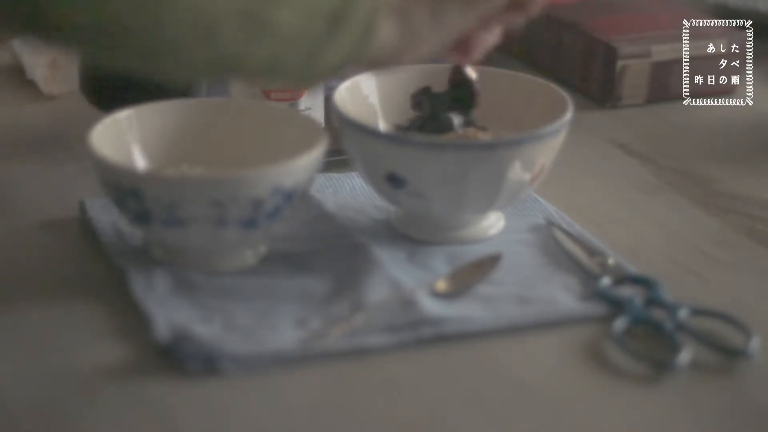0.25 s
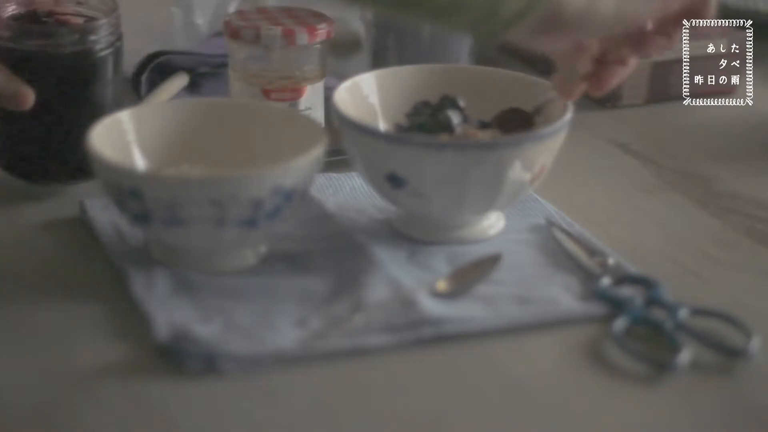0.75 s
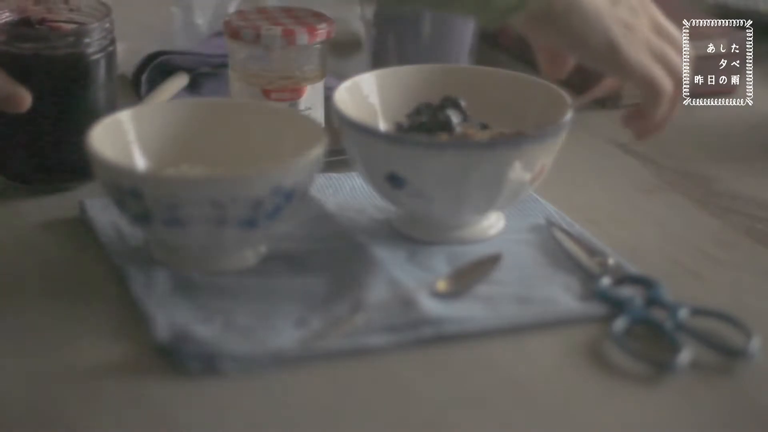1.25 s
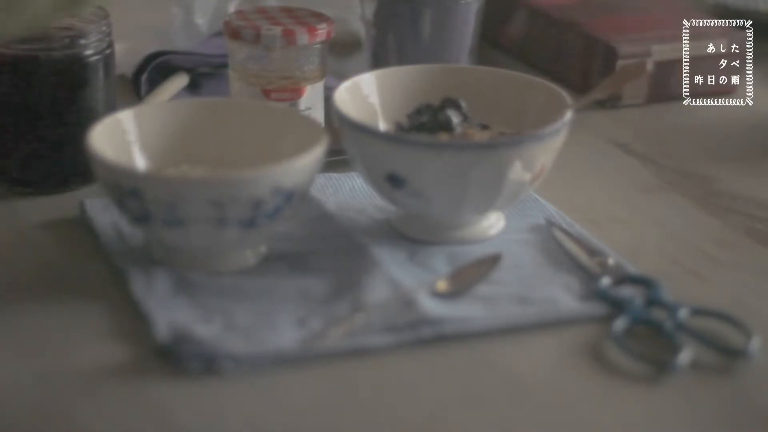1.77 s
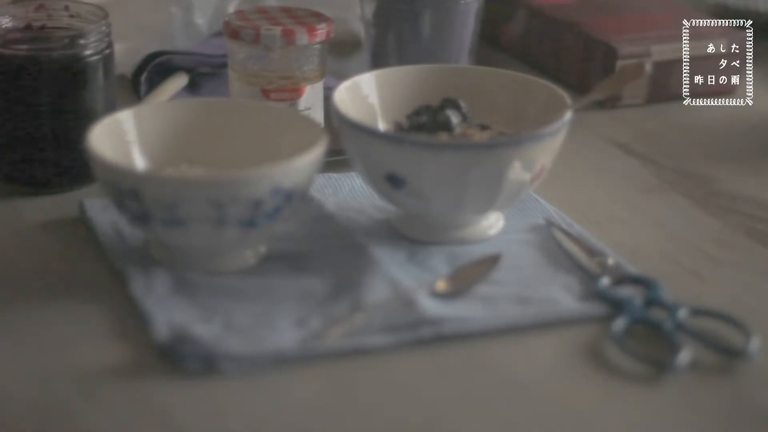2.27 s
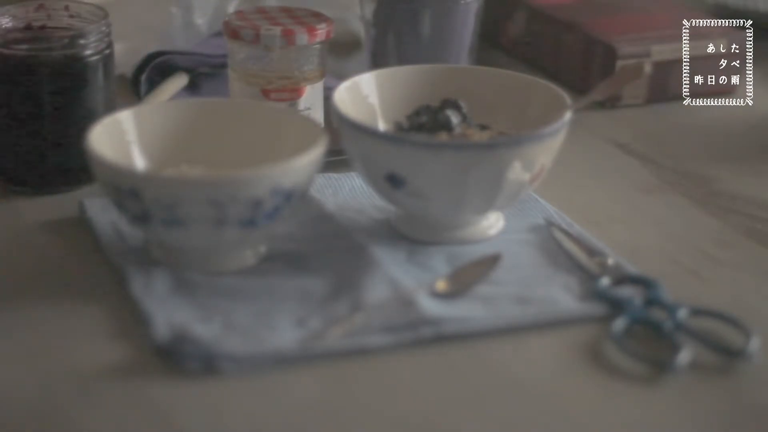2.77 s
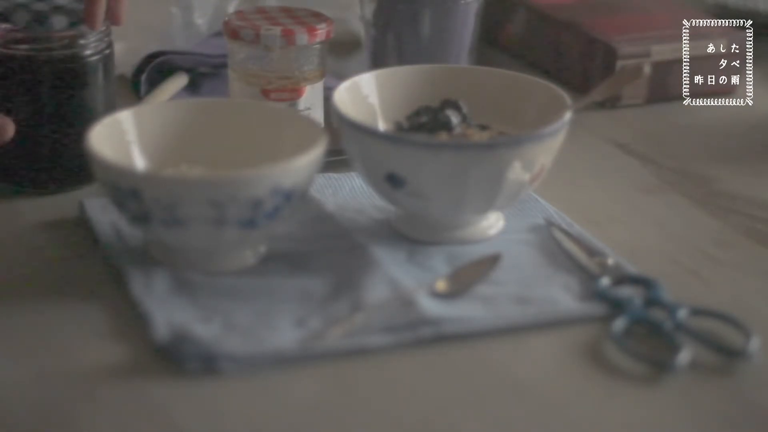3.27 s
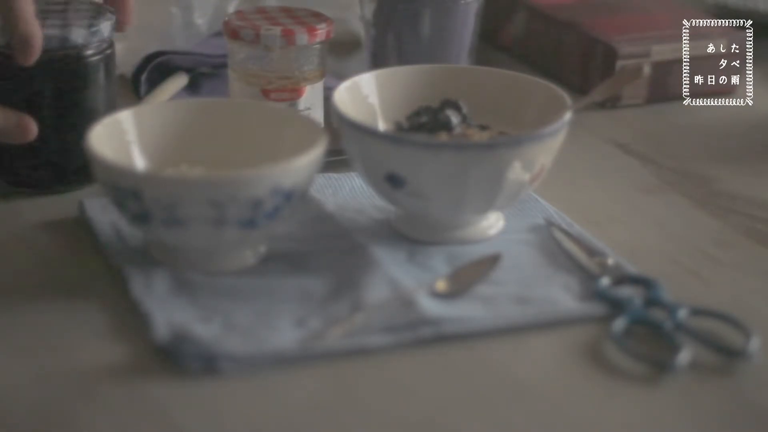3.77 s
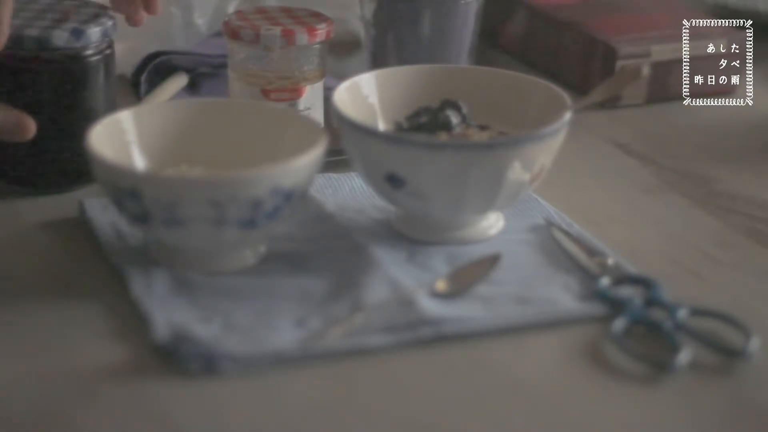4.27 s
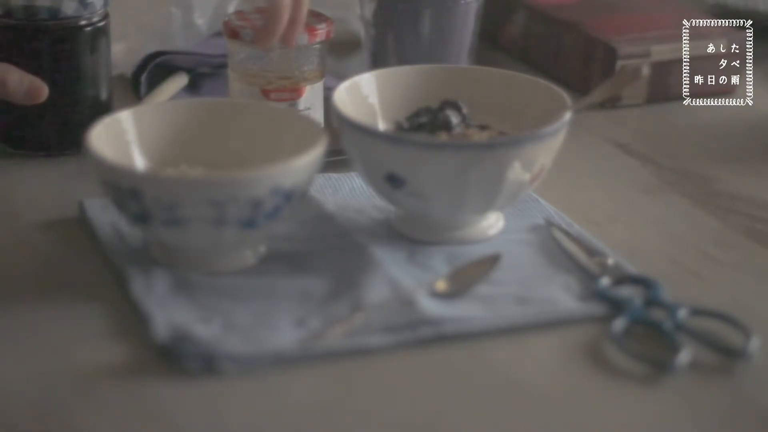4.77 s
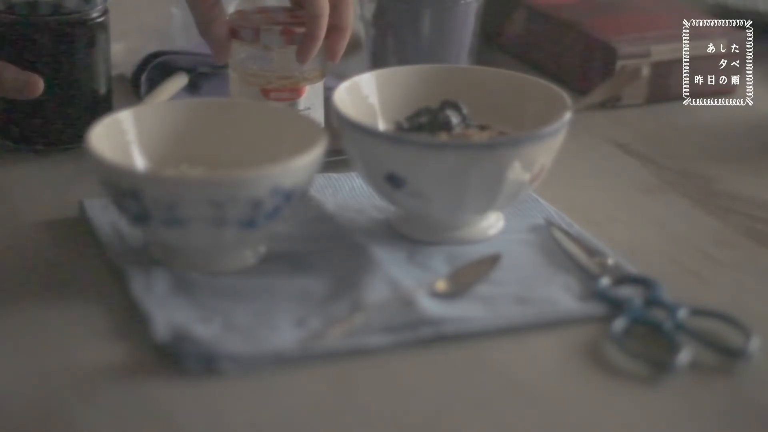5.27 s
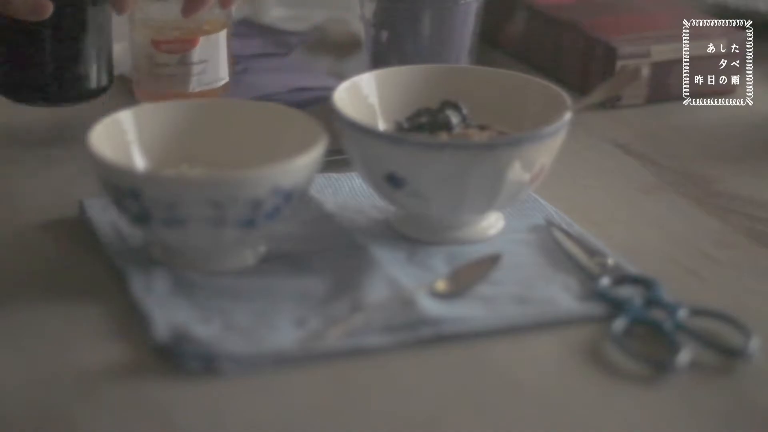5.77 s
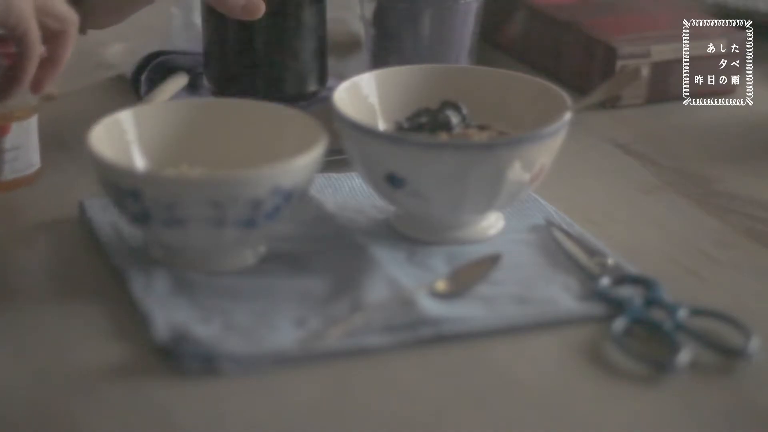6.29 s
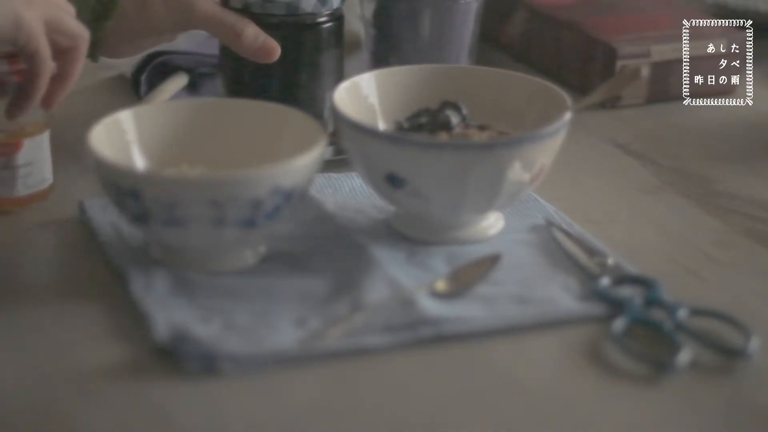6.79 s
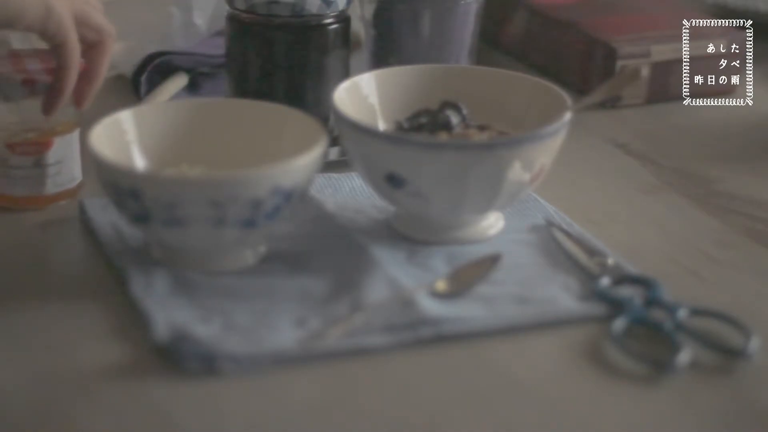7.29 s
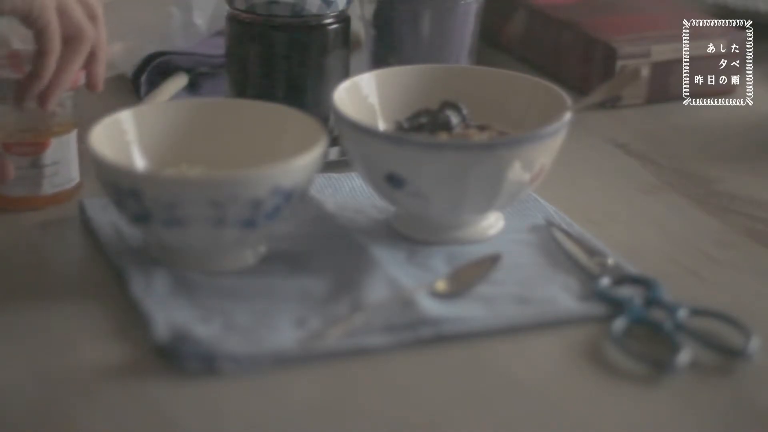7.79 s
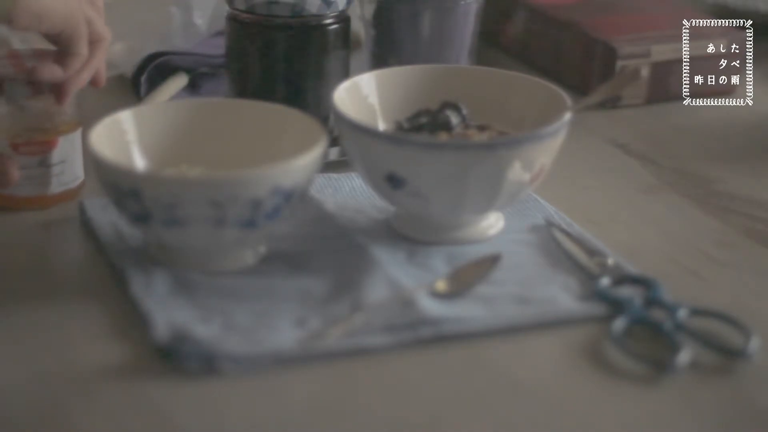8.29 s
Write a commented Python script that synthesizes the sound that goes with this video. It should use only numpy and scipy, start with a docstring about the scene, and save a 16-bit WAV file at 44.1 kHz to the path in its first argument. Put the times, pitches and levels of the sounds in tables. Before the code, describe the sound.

Close stereo pickup at a kitchen table in a small room with faint hiss and low appliance drone. A spoon drops softly into cereal and clinks on a ceramic bowl, then a full jar thuds down and scrapes briefly. Its glass lid chatters and seats with a hollow knock, the wire clasp clicks and the jar drags. Another jar knocks, and a hard jar landing leads to light slides, thumps and ticks.

```python
"""The lid of a full glass jar rattles shut and is clamped, close to a stereo microphone at a kitchen table.
Around it a spoon is laid in a ceramic bowl, and jars knock, land, slide and scrape on the tabletop.
Blows are damped modes plus random cracks; rubbing is random slips under the gain of a moving hand.
A small room answers most of them with a diffuse tail; behind lie even hiss and a low appliance drone."""
import sys
import numpy as np
from scipy import signal
from scipy.fft import rfft, irfft, next_fast_len
from scipy.io import wavfile
from scipy.ndimage import map_coordinates

SR = 44100
rng = np.random.default_rng(int(sys.argv[2]) if len(sys.argv) > 2 else 0)


def dump(signal):
    """Clip the signal to [-1, 1] and save it as 16-bit WAV at the path in sys.argv[1]."""
    limited = np.clip(np.atleast_2d(signal).T, -1, 1)
    pcm = np.round(limited * 32767).astype(np.int16)
    wavfile.write(sys.argv[1], SR, pcm)


N = 376702
HIT = np.arange(SR // 2) / SR  # time axis of one blow, s

# spectrum of hard knocks, of jars and of spoon on bowl: f/Hz, level/dB
KNOCK_COLOUR = [(60, -22), (170, -7), (290, -4.5), (450, -14.5), (700, 2.5), (1000, 8.5), (1400, 4),
                (2200, 8), (3500, 1), (6000, -5), (9000, -7), (11000, -18.5), (16000, -34)]


def amp(db):
    """Decibels to gain."""
    return 10 ** (np.asarray(db) / 20)


def unit(x):
    """Scale to rms 1."""
    return x / np.sqrt(np.mean(x ** 2) + 1e-20)


def one(x):
    """Scale to energy 1."""
    return unit(x) / np.sqrt(x.shape[-1])


def along(points, hz):
    """Read (f/Hz, value) points on a log frequency axis."""
    f, v = np.transpose(points)
    return np.interp(np.log(hz + 1), np.log(f + 1), v)


def shaped(x, gain):
    """Causal, minimum-phase filter with the given gain over frequency."""
    n = x.shape[-1]
    m = 2 * next_fast_len(n // 2 + 4096)
    log_gain = np.log(np.maximum(gain(np.fft.rfftfreq(m, 1 / SR)), 1e-6))
    # folding the cepstrum onto positive time makes the filter causal
    cepstrum = irfft(log_gain)
    cepstrum[1:m // 2] *= 2
    cepstrum[m // 2 + 1:] = 0
    return irfft(rfft(x, m) * np.exp(rfft(cepstrum)), m)[..., :n]


def coloured(x, points):
    """Filter x through a spectrum of (f/Hz, level/dB) points."""
    return shaped(x, lambda hz: amp(along(points, hz)))


def spread(pair, side_points):
    """Two unrelated sounds as the middle and the sides of a stereo image."""
    side = coloured(pair[1], side_points)
    return np.array([pair[0] + side, pair[0] - side])


def panned(x, db):
    """Raise the left side and lower the right by db; a negative db leans right."""
    return x * amp(db * np.array([[1], [-1]]))


def in_room(x, wet_db):
    """Direct sound plus a fresh diffuse tail of the small room that dies faster in the treble."""
    # decay of the room: f/Hz, t60/s
    decay = [(100, 0.63), (300, 0.35), (1000, 0.31), (3000, 0.22), (8000, 0.21), (14000, 0.17)]
    # width of the tail: f/Hz, side level/dB
    width = [(120, -25.5), (300, -15), (700, -6.5), (1400, -4), (2500, 0.5), (8000, 2)]
    hz, t, noise = signal.stft(rng.standard_normal((2, len(HIT))), SR, nperseg=256)
    fading = noise * amp(-60 * t / along(decay, hz)[:, None])
    tail = signal.istft(fading, SR, nperseg=256)[1][:, :len(HIT)]
    build_up = 1 - np.exp(-HIT / 0.00086)
    tail = spread(one(tail * build_up), width)
    return x + amp(wet_db) * signal.fftconvolve(x[None], tail, axes=1)[:, :len(x)]


def ring(modes, attack=0.00059):
    """Damped modes (f/Hz, level/dB, t60/s) that swell over attack/s, at slightly new strengths each time."""
    scatter = 1.8 * rng.standard_normal(len(modes))  # dB
    tones = 0
    for (hz, db, t60), new_db in zip(modes, scatter):
        decay = amp(db + new_db - 60 * HIT / t60)
        tones = tones + decay * np.sin(2 * np.pi * hz * HIT) * rng.choice([-1, 1])
    return one(tones * (1 - np.exp(-HIT / attack)))


def crack(colour, t60):
    """Brief rattle of two hard surfaces: a decaying random burst made spectrally even, cut at t60, coloured."""
    burst = rfft(rng.standard_normal(len(HIT)) * amp(-60 * HIT / t60))
    even = irfft(burst / (np.abs(burst) + 1e-9), len(HIT)) * (HIT < t60)
    return one(coloured(even, colour))


def add(track, s, blow, low_db, mid_db, high_db):
    """Place a blow; its weight and hardness set the opening level of bass, middle and treble."""
    bands = [[90, 560], [560, 3500], [3500, 19000]]  # Hz
    opening, start = SR // 50, round(s * SR)  # samples
    for edges, db in zip(bands, (low_db, mid_db, high_db)):
        band = signal.butter(5, edges, "band", fs=SR, output="sos")
        part = signal.sosfilt(band, blow)
        opening_rms = np.sqrt(np.mean(part.mean(0)[:opening] ** 2))
        part = part * amp(db) / opening_rms
        track[:, start:start + len(HIT)] += part[:, :N - start]


def slips(rate, scatter_db):
    """Friction: tiny catches of random size at random moments, rate a second on average."""
    return (rng.random(N) < rate / SR) * rng.standard_normal(N) * amp(scatter_db * rng.standard_normal(N))


def stroke(start, rise, hold, fall, db):
    """Gain of a rub that gathers speed, holds it and slows to rest; loudness is a power of the speed."""
    corners = start + np.cumsum([0, rise, hold, fall])
    speed = np.interp(np.arange(N) / SR, corners, [0, 1, 1, 0])
    return amp(db) * speed ** 1.28


def wobble(rate):
    """A smooth random curve, rate knots a second."""
    return map_coordinates(rng.standard_normal(N // 100), [np.arange(N) * rate / SR])


def kitchen():
    """The quiet kitchen: even, coloured noise and a low sine whose pitch wavers, the drone of an appliance."""
    # spectrum of the hiss: f/Hz, level/dB
    hiss_colour = [(12, -54), (20, -36), (40, -6), (60, -8.5), (81, -7.5), (110, -1.5), (170, -5),
                   (400, -10.5), (1120, -16), (2320, -19), (5500, -21), (7600, -26), (11000, -23.5),
                   (16000, -26)]
    # width of the hiss: f/Hz, side level/dB
    hiss_width = [(60, -3.5), (110, -9), (200, -5.5), (380, -3), (700, -2.5), (1290, -0.5), (2380, 0),
                  (4400, 0), (8120, 1), (15000, 0.5)]
    hiss = coloured(rng.standard_normal((2, N)), hiss_colour)
    air = spread(np.array([unit(n) for n in hiss]), hiss_width)
    drift_hz = 3 * unit(coloured(rng.standard_normal(N), [(5, 13), (15, -14), (60, -84)]))
    drone = unit(np.sin(2 * np.pi * np.cumsum(57 + drift_hz) / SR))
    return amp(-68.5) * air + amp(-78.5) * drone


def slides():
    """Glass catches and slips on the table, which rumbles under it; one speed drives rumble and grit."""
    # jars dragged over the table: start t/s, rise/s, hold/s, fall/s, rumble level/dB, grit over rumble/dB
    drags = [(1.682, 0.022, 0.024, 0.04, -53, -7.5), (4.307, 0.22, 0.33, 0.085, -46, -5.5),
             (6.977, 0.15, 0.078, 0.13, -49, -10), (7.904, 0.06, .05, 0.15, -65.5, -2.5),
             (8.137, .11, 0.062, 0.053, -60.5, -27)]
    # spectrum of the rumble: f/Hz, level/dB
    rumble_colour = [(30, -42), (78, -38), (105, -7), (125, -0.5), (148, -9.5), (175, 5), (205, -4.5),
                     (285, -0.5), (350, -13.5), (410, -2), (520, -10), (700, -42), (1000, -34), (1600, -96)]
    # spectrum of the grit: f/Hz, level/dB
    grit_colour = [(290, -18), (500, -8), (564, -6.5), (610, -1), (998, -4.5), (1590, -11.5), (1720, -8),
                   (5400, -28), (8610, -27), (12000, -46), (15600, -85), (22000, -120)]
    # short, hard scrapes of glass: start t/s, rise/s, hold/s, fall/s, level/dB
    scrapes = [(2.056, .02, 0.028, 0.027, -70), (2.124, 0.039, 0.0095, 0.02, -42.5)]
    # spectrum of the scrapes: f/Hz, level/dB
    scrape_colour = [(120, -36), (200, -30), (301, -17), (504, -26.5), (591, -13), (829, -8.5),
                     (1120, -4.5), (1250, -11.5), (1570, -6), (1850, -10), (2370, -14.5), (3630, -26),
                     (7120, -27.5), (14000, -44)]
    # a jar rubs briefly into a tone: start t/s, rise/s, hold/s, fall/s, level/dB
    squeak_stroke = (1.705, .02, .022, .025, -63)
    grit_sag = 18  # dB per s: the grit smooths out as a slide goes on

    t = np.arange(N) / SR
    rumble_gain, grit_gain = np.zeros((2, N))
    for start, rise, hold, fall, db, grit_db in drags:
        gain = stroke(start, rise, hold, fall, db)
        rumble_gain += gain
        grit_gain += gain * amp(grit_db - grit_sag * np.maximum(t - start - rise, 0))
    # the rumble swells and dips as the glass catches; the grit comes in small, quick clumps
    rumble_gain *= amp(0.5 * wobble(rate=42))
    grit_gain *= amp(1 * wobble(rate=110))
    rumble = rumble_gain * unit(coloured(slips(rate=1200, scatter_db=1.0), rumble_colour))
    grit = grit_gain * unit(coloured(slips(rate=2000, scatter_db=-1.5), grit_colour))
    scrape_gain = sum(stroke(*row) for row in scrapes)
    scrape = scrape_gain * unit(coloured(slips(rate=2200, scatter_db=-2.0), scrape_colour))
    squeak = stroke(*squeak_stroke) * np.sin(2 * np.pi * 1750 * t)
    roomy_rumble = in_room(amp(-3.5) * rumble, wet_db=-4.5)
    roomy_rub = in_room(amp(-3.5) * grit + amp(-3.0) * scrape, wet_db=-1)
    return roomy_rumble + roomy_rub + squeak


def clicks():
    """Light, dry ticks of wire clasp and lids: a short crack with fast-dying metal modes."""
    # the ticks: t/s, level/dB, relative knock level/dB
    ticks = [(4.0961, -50.5, -0.5), (4.1418, -40, -16), (4.1808, -43, -17), (4.2031, -48, -7),
             (7.147, -49.5, -15), (8.155, -52.5, -10), (8.1965, -56.5, 7.5), (8.2521, -50.5, -1),
             (8.2675, -45, 0)]
    # spectrum of the crack: f/Hz, level/dB
    tick_colour = [(59, -31), (100, -7), (189, 12), (801, 21), (950, 18), (1330, 18), (3190, -16),
                   (4110, -11.5), (7610, -12), (8280, -9.5), (16000, -55)]
    # modes of the clasp: f/Hz, level/dB, t60/s
    clasp = [(1470, 10.5, 0.021), (4370, -26, .03), (6170, 0.5, 0.0087), (9200, -7, 0.012)]
    out = np.zeros((2, N))
    for s, db, knock_db in ticks:
        blow = crack(tick_colour, t60=0.005) + amp(-13) * ring(clasp)
        thump_db = db - 20  # the table under a click
        add(out, s, in_room(blow, wet_db=-1), thump_db, db + knock_db - 13.5, db - 17.5)
    return out


def spoon():
    """Spoon and filled bowl ring briefly together; a soft touch favours the lowest mode; cereal rustles."""
    # spoon on bowl: t/s, level/dB, relative thump/dB, relative low ring/dB, softness/dB
    touches = [(0.817, -67, 6, 5.5, 15.5), (1.181, -31.5, -25, -13, 2.5)]
    # modes of the bowl: f/Hz, level/dB, t60/s
    bowl = [(954, -23, 0.24), (2115, 2.5, 0.08), (2450, -8, 0.048), (3866, -26, 0.27), (4220, -30, .21),
            (4940, -18, 0.092), (5524, -17, 0.15), (5530, 6, 0.053), (6270, -21, 0.12), (7260, -20, 0.088),
            (8100, -17, 0.17), (8720, -19, 0.1), (10000, -13, 0.052)]
    # the spoon drops into the cereal, which then settles: start t/s, rise/s, hold/s, fall/s, level/dB
    rustles = [(0.657, .001, 0.0028, .015, -57.5), (0.661, 0.027, .03, .04, -67.5)]
    out = np.zeros((2, N))
    lowest_hz = bowl[0][0]
    for s, db, thump_db, low_db, soft_db in touches:
        modes = [(hz, level + 2 * soft_db * (lowest_hz / hz) ** 2, t60) for hz, level, t60 in bowl]
        contact = amp(-12.5 - soft_db) * crack(KNOCK_COLOUR, t60=0.051)
        blow = in_room(ring(modes, attack=0.0012), wet_db=-9) + in_room(contact, wet_db=2)
        add(out, s, blow, db + thump_db - 8.5, db + low_db - 6.5, db - 8.0)
    grains = slips(rate=3400, scatter_db=-12)
    rustle = unit(coloured(grains, [(1500, -24), (4000, -5.5), (10000, 2), (15000, -8)]))
    rustle = sum(stroke(*row) for row in rustles) * rustle
    return panned(out, -.8) + panned(rustle, 0.5)


def thuds():
    """Weight from above sets the tabletop ringing; gentle thumps build up more slowly."""
    # thumps on the tabletop, the first from under the bowl as the spoon touches it, the rest from
    # jar bottoms: t/s, level/dB, relative knock level/dB
    thumps = [(0.817, -50, -40), (1.416, -19.5, -7.5), (1.499, -52, -1), (1.52, -41.5, -17),
              (6.937, -37, -5), (7.404, -49, -8), (7.683, -31.5, -7), (7.809, -45.5, 1.5), (7.85, -52, -9),
              (8.153, -45, -1.5), (8.495, -45.5, -8)]
    # spectrum of the contact: f/Hz, level/dB
    thud_colour = [(50, -35), (90, -20), (130, -8), (175, -6.5), (215, -7), (290, 2), (360, -0.5),
                   (440, -1), (540, -12.5), (700, -17), (1000, -21), (2100, -31.5), (3500, -37.5),
                   (14000, -53.5)]
    # modes of the tabletop: f/Hz, level/dB, t60/s
    table_modes = [(136.7, -10, 0.16), (187.4, -11, 0.32), (216, -10, 0.13), (284, 0, 0.1), (319, -6, 0.17),
                   (390, -1.5, 0.064), (450, -15, 0.11), (512, -18.5, 0.096), (654, -35, 0.12)]
    usual_db, usual_knock_db = -42.5, -6.5  # strength and knock of an average thump
    dulling = .45  # heavier thumps are duller: dB of treble share lost per dB of strength
    soft_tilt, pivot_hz = 0.52, 200  # soft thumps favour low modes: dB per octave for each dB less knock
    out = np.zeros((2, N))
    for s, db, knock_db in thumps:
        rise = np.interp(db, [-48, -28], [.008, .001])  # s
        tilt_db = soft_tilt * min(knock_db - usual_knock_db, 0)
        modes = [(hz, level + tilt_db * np.log2(hz / pivot_hz), t60) for hz, level, t60 in table_modes]
        table = ring(modes)
        contact = amp(tilt_db) * crack(thud_colour, t60=0.0285)
        blow = (contact + amp(-2.0) * table) * (1 - np.exp(-HIT / rise))
        tick_db = knock_db - 27.5 - dulling * (db - usual_db)
        add(out, s, in_room(blow, wet_db=-3), db - 15.0, db + knock_db - 14.5, db + tick_db)
    return out


def knocks():
    """Hard, bright knocks of the jars: crack and jar modes, with a hollow note from inside the jar."""
    # the knocks: t/s, level/dB, relative thump/dB, relative tick/dB, hollow f/Hz, hollow level/dB, t60/s
    blows = [(0.134, -60, -2, -16, 457, -5, 0.067), (1.915, -50.5, 1, -23, 734, -4, 0.036),
             (5.185, -39, -4, -18.5, 417, -12, 0.27), (5.377, -41, 1, -11, 666, -3.5, 0.011),
             (6.765, -24, -4.5, -12.5, 703, -3, 0.11)]
    # modes of the jar: f/Hz, level/dB, t60/s
    jar = [(333, -12, 0.21), (461, -9, 0.29), (1450, 19, 0.037), (2036, 9, 0.051), (3040, -31, .05),
           (4840, -32, .05)]
    out = np.zeros((2, N))
    for s, db, thump_db, tick_db, hollow_hz, hollow_db, t60 in blows:
        contact = crack(KNOCK_COLOUR, t60=0.06) + amp(-8.0) * ring(jar)
        hollow = amp(hollow_db) * ring([(hollow_hz, 0, t60)], attack=0.0069)
        blow = in_room(contact, wet_db=-1) + in_room(hollow, wet_db=-6.0)
        add(out, s, blow, db + thump_db - 14.5, db - 14, db + tick_db - 4.0)
    return out


def lid():
    """Each contact on the rim rings the glass lid and puffs the air in the narrowing gap."""
    # the lid chatters on the rim: t/s, level/dB, relative hardness/dB, glass ring level/dB
    contacts = [(2.942, -61.5, -9, -1), (3.344, -34.5, -11.5, 2), (3.422, -40, -20, 12.5),
                (3.468, -20, -17.5, 2.5), (3.483, -25, -34, -25), (3.5, -34, -8.5, 7.5),
                (3.523, -41.5, -9.5, -4), (3.58, -47.5, -14, 10), (3.616, -30, -12, -25),
                (3.626, -17, -15, 5), (3.643, -25, -28, -19), (3.673, -36, -8.5, 3), (3.702, -25, -9.5, -3),
                (3.743, -26.5, -17.5, 1.5), (3.78, -20, -2.5, -1), (3.851, -49, 0, 1)]
    # spectrum of the contact: f/Hz, level/dB
    contact_colour = [(100, -17), (170, 2.5), (280, -5), (400, -8), (750, -15), (1200, -9), (1400, -10),
                      (2200, -5), (2650, -14), (3150, -12.5), (3600, -9), (4300, -10.5), (4900, 3),
                      (9000, -3.5), (11500, -13), (16000, -18)]
    # modes of the free glass: f/Hz, level/dB, t60/s
    glass_modes = [(289.4, -10, 0.11), (1056, -4.5, 0.081), (1165, -9.5, 0.16), (1737, -13, 0.071),
                   (2256, -22, 0.1), (3030, -13.5, 0.071), (3137, -16, 0.094), (3980, -6.5, 0.025),
                   (4680, 4, 0.014), (6520, -3, 0.038), (9000, -11.5, 0.036)]
    # the rim rings high and short when the lid lands on it all round: f/Hz, level/dB, t60/s
    rim_modes = [(4780, 3, 0.046), (5460, -3, 0.058), (5600, -10, .06), (7020, -12, 0.093), (8530, -7, .03),
                 (8900, -13, 0.024)]
    # the air under the lid sounds lower as the gap closes: t/s, f/Hz
    gap = [(3.344, 1400), (3.42, 1088), (3.615, 1046), (3.628, 900), (3.70, 873), (3.78, 662)]
    # a soft contact mostly pumps the air, a hard one mostly cracks: hardness/dB, air level/dB
    puff = [(-27, 14), (-16.5, 8), (-11, -9.5)]
    # soft contacts swell more slowly: hardness/dB, rise/s
    swell = [(-27.5, 0.0016), (5.5, 0.00036)]
    # the dry snap of the rim as it seats: f/Hz, level/dB
    snap_colour = [(1000, -29), (3500, 3), (8500, 17), (11500, -8), (16000, -17)]
    # the lid settles on its seal between these times: start t/s, end t/s
    seating = (3.72, 3.78)
    usual_db, thump_slope = -30, -0.56  # average contact; dB of bass share per dB of strength
    open_gap_hz, thump_per_octave = 1020, 24  # bass grows (dB) as the gap note sinks below this pitch
    out = np.zeros((2, N))
    for s, db, hard_db, glass_db in contacts:
        rise = np.interp(hard_db, *np.transpose(swell))
        # once the lid sits on its seal, the glass is damped and the rim takes the blow
        seated = np.interp(s, seating, [0, 1])
        damped = [(hz, level, t60 * (1 - seated / 2)) for hz, level, t60 in glass_modes]
        glass = amp(glass_db) * ring(damped, attack=rise / 2)
        rim = amp(-14.5 + 16.6 * seated) * ring(rim_modes)
        snap = seated * amp(-1.5) * panned(crack(snap_colour, t60=0.0019), -3.5)
        # the seated lid puffs more and also knocks with hollow notes of its own
        gap_hz = np.interp(s, *np.transpose(gap))
        air_db = np.interp(hard_db, *np.transpose(puff)) + 10.5 * seated
        notes = [(gap_hz, 0, .03), (840, -35 + 28 * seated, .14), (515, -36 + 23 * seated, .12)]
        air = amp(air_db) * ring(notes, attack=rise)
        contact = in_room(crack(contact_colour, t60=0.0082), wet_db=-0.5)
        blow = contact + in_room(glass + rim + air, wet_db=-6.0) + snap
        closing = max(np.log2(open_gap_hz / gap_hz), 0)  # octaves
        thump_db = -29 + thump_slope * (db - usual_db) + thump_per_octave * closing
        add(out, s, blow, db + thump_db, db - 11.5, db + hard_db - 12.5)
    return out


def scene():
    """Everything on the table, in the quiet of the kitchen."""
    return kitchen() + slides() + clicks() + spoon() + thuds() + knocks() + lid()


def record(dry):
    """The recorder keeps nothing above its band limit."""
    top_hz = 15850
    m = next_fast_len(N + SR // 2)
    passed = np.fft.rfftfreq(m, 1 / SR) < top_hz
    return irfft(rfft(dry, m) * passed, m)[:, :N]


dry = scene()
out = record(dry)
dump(out)
```